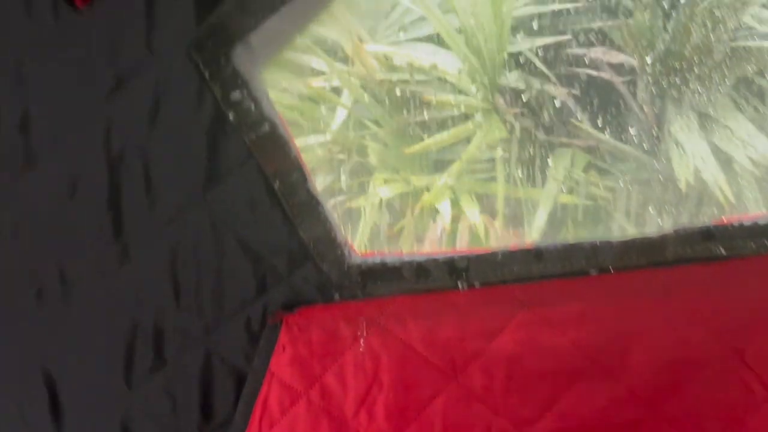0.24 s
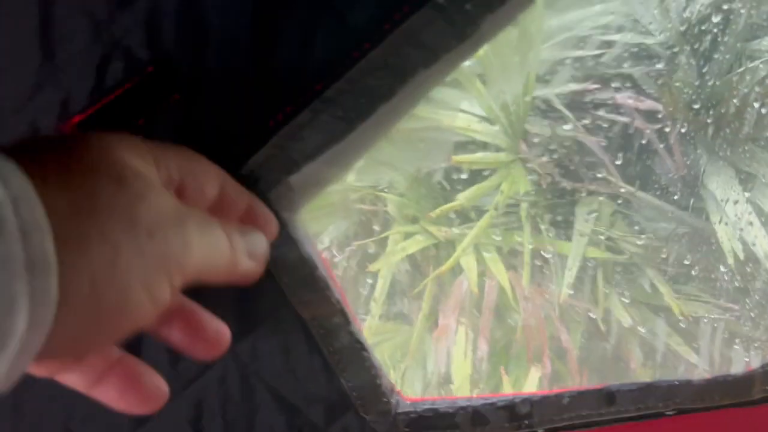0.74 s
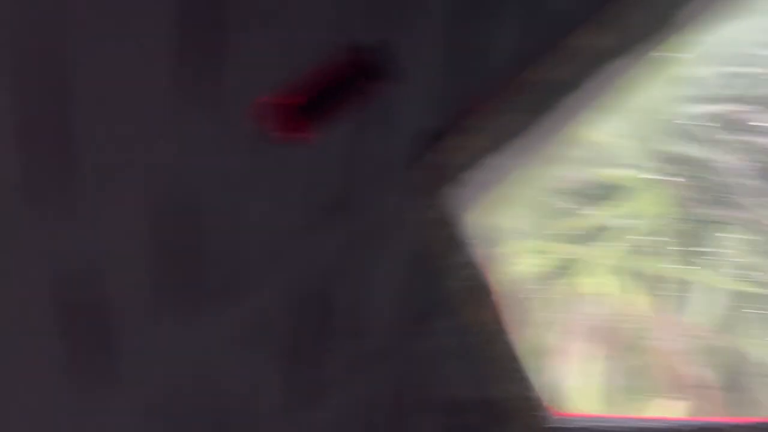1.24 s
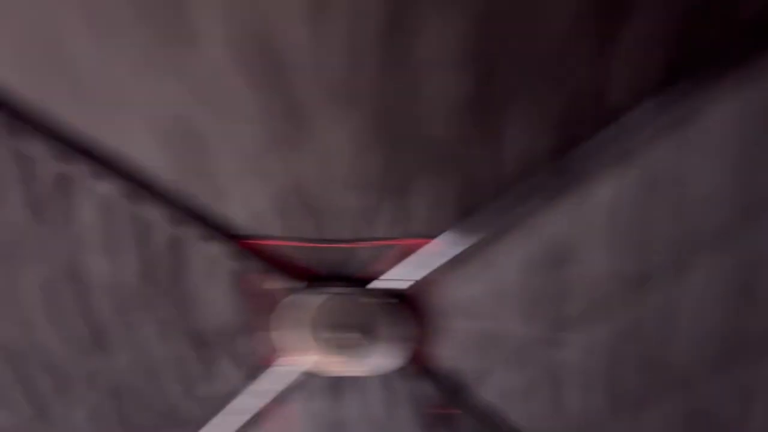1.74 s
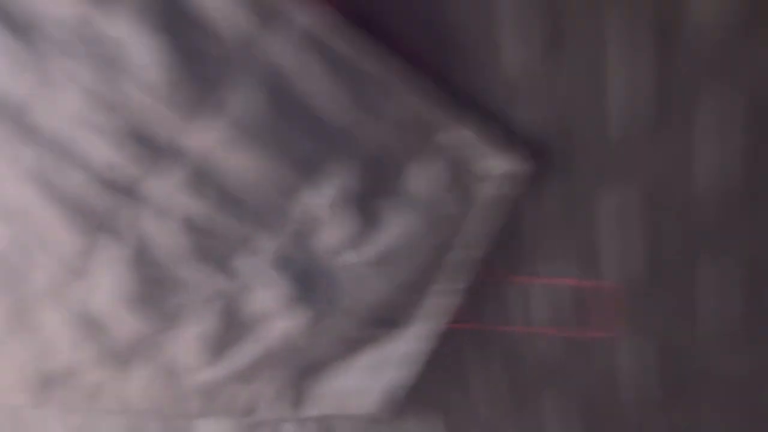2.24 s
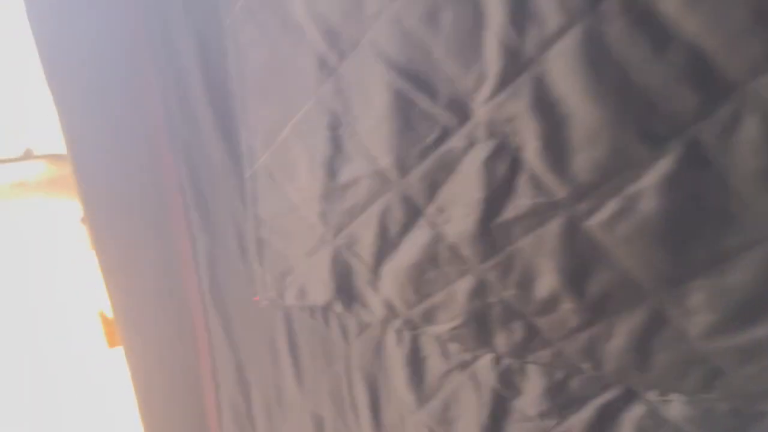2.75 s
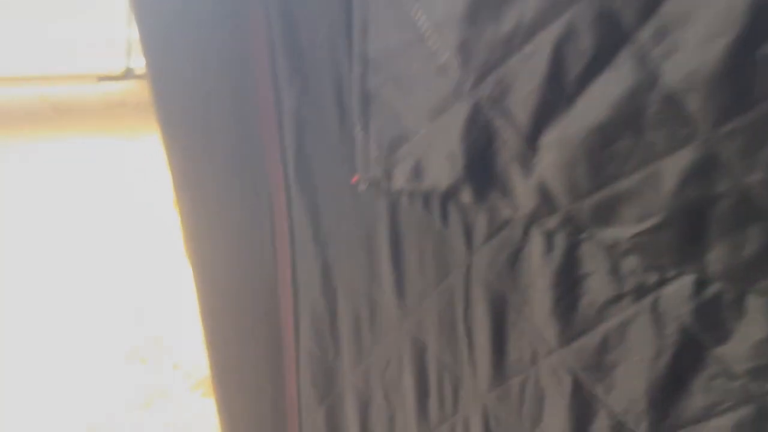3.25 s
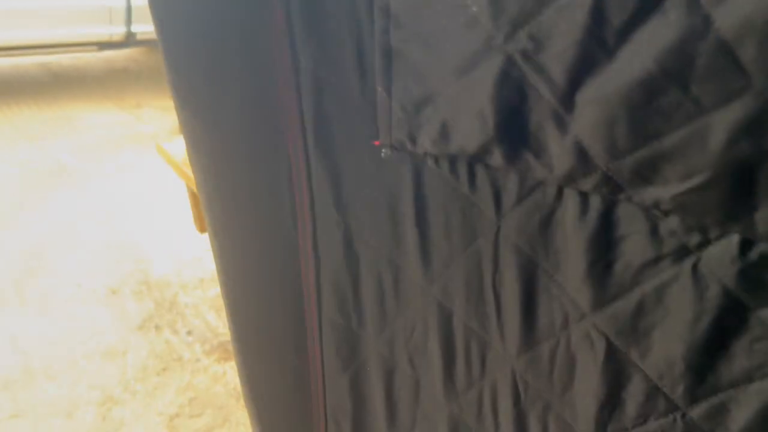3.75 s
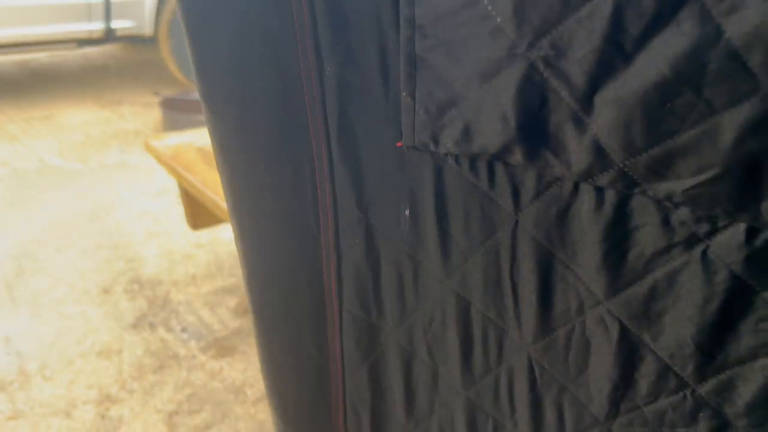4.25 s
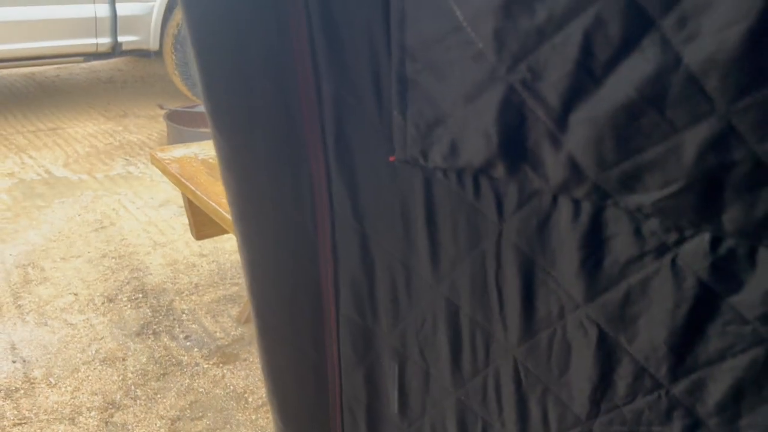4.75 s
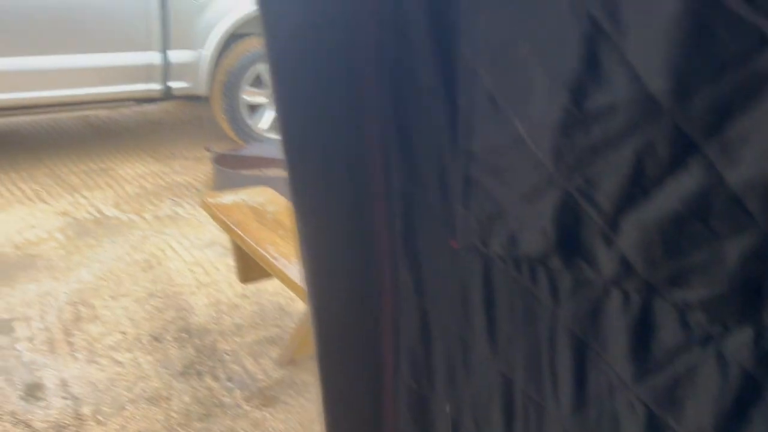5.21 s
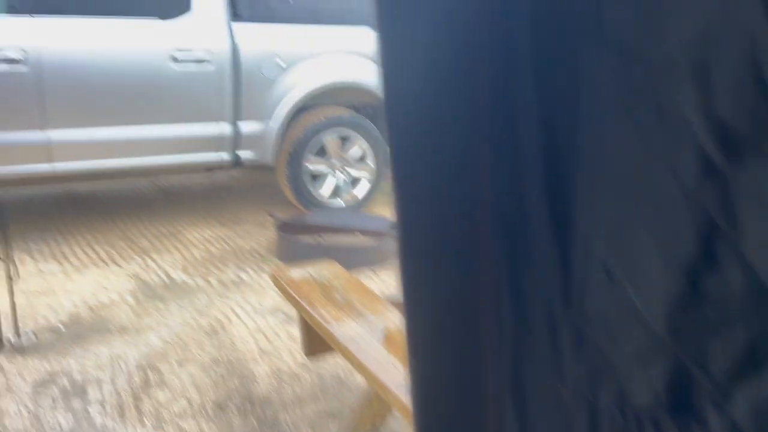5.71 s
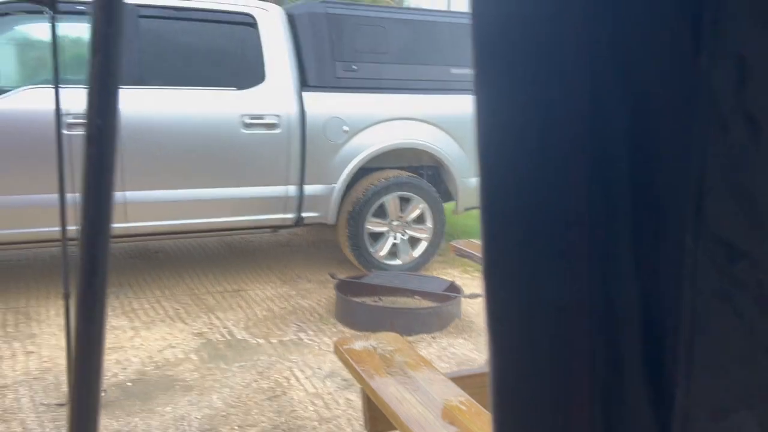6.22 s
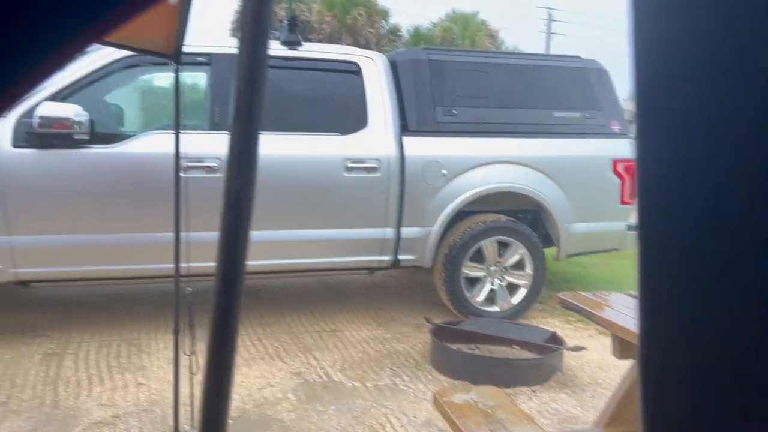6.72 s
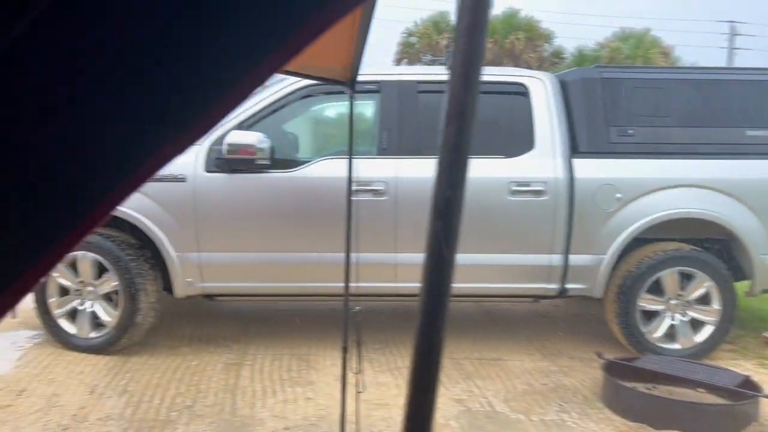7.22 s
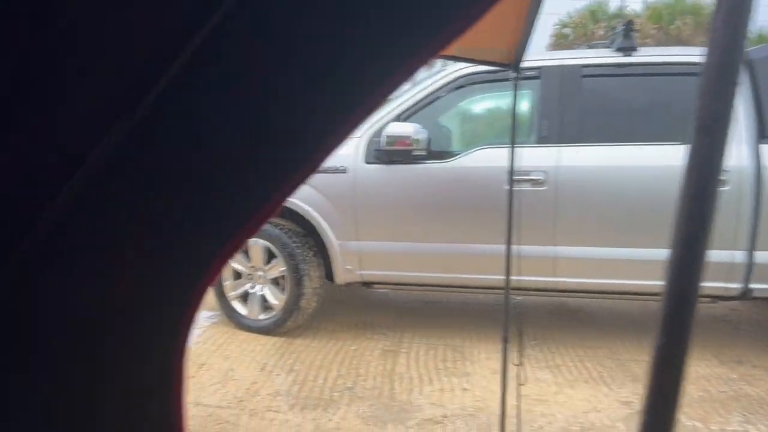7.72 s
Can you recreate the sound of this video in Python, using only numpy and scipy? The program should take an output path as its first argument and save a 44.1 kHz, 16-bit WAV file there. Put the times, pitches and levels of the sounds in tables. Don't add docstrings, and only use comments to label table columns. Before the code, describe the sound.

Low, steady air conditioner drone with rushing air, under a soft hiss of rain on tent cloth and crisp, irregular drop ticks.

```python
import sys
import numpy as np
from scipy import signal
from scipy.fft import rfft, irfft, next_fast_len
from scipy.io import wavfile
from scipy.ndimage import uniform_filter1d, map_coordinates

SR = 44100
rng = np.random.default_rng(int(sys.argv[2]) if len(sys.argv) > 2 else 0)


def gain_from_db(level_db):
    decades = np.asarray(level_db, float) / 20
    return 10 ** decades


def pcm_store(signal):
    levels = np.round(np.clip(np.atleast_2d(signal), -1, 1) * 32767)
    wavfile.write(sys.argv[1], SR, levels.astype(np.int16).T)


N = 351374

# time_s, facing
FACING = [
    (0, 0.67),
    (1.2, 0),
    (2.6, 0.23),
    (5.0, 0.46),
    (6.2, 0.9),
    (7.97, 0.8),
]
# time_s, level_db
TURBULENCE = [(0.0, -23.5), (0.11, -17.5), (0.18, -17.5), (1.88, -20), (1.91, -17.5), (3.48, -18),
              (3.51, -14.5), (3.62, -18.5), (6.9, -19.5), (7.81, -18), (7.97, -24.5)]
# facing_unit_db, door_gain_db, side_on_gain_db, patch_depth_db
AIR_LAYERS = [
    (1, -0.5, 0.17, -0.22),
    (-32.5, 1.5, -0.3, 1.35),
    (-28.5, -2.5, -1.8, 0.74),
    (-37, 3, 2.5, 0.7),
    (-40.5, -6, -1.5, 2.5),
    (-36.5, -6, -5, 2),
]
# pitch_hz, density_db
RUMBLE_SPECTRUM = [(12, -56), (24, -45), (45, -4), (81, 0.5), (114, -1), (154, -2.5), (257, -20),
                   (302, -24.5), (320, -18), (420, -32.5), (700, -120)]
# pitch_hz, density_db
STREAM_SPECTRUM = [(450, -34), (680, 0.5), (900, -3), (1100, -2.5), (1700, -6.5), (2400, -12.5),
                   (3500, -20), (6000, -52)]
# pitch_hz, density_db
CASING_SPECTRUM = [(140, -7.5), (230, -2.5), (330, -2), (440, -3), (520, -13), (700, -45)]
# pitch_hz, density_db
DUCT_SPECTRUM = [(400, -8), (480, 0.5), (560, -1), (640, -2.5), (760, -43)]
# pitch_hz, density_db
GRILLE_SPECTRUM = [(380, -39), (430, -5), (455, -2.5), (480, -2.5), (540, -38)]
# pitch_hz, density_db
HOUSING_SPECTRUM = [(240, -42), (270, -7), (290, 1), (310, -9), (340, -37)]
# time_s, pitch_hz, level_db
FAN_TONE = [(0, 336, -44), (.4, 336, -41), (.9, 336, -33.5), (1.2, 336, -37), (1.7, 336.3, -33),
            (1.95, 335.5, -43), (2.2, 335.4, -34.5), (3.6, 335.5, -35.5), (4.1, 335.5, -39),
            (4.7, 335, -34), (5.2, 332.5, -34.5), (5.6, 331.5, -40), (6.3, 329, -41), (6.9, 326.5, -38),
            (7.4, 325, -43), (7.65, 324, -36), (7.97, 323.5, -36)]
# time_s, pitch_hz, level_db
COMPRESSOR_TONE = [(0, 232, -52), (2, 232, -48), (2.8, 231, -42), (3.3, 231, -50), (5.1, 230, -46),
                   (5.35, 229.5, -34), (5.9, 229, -31), (6.15, 228.5, -38), (6.4, 228, -48),
                   (6.9, 228, -33), (7.15, 228, -38), (7.35, 228, -50), (7.97, 228, -52)]
# time_s, pitch_hz, level_db
MOTOR_TONE = [(0, 882, -54), (2.4, 882, -58), (3.2, 880, -52), (4.2, 881, -51), (5.6, 881, -52),
              (7, 878, -57), (7.97, 884, -52)]
# time_s, pitch_hz, level_db
PANEL_TONE = [(0, 765, -49), (2, 765, -50), (3.5, 762, -56), (7.97, 760, -56)]
# time_s, pitch_hz, level_db
ELECTRIC_TONE = [(0, 6160, -62), (4, 6240, -65.5), (7.97, 6240, -67)]
# pitch_hz, density_db
HISS_SPECTRUM = [(1500, -20), (2800, -1), (4000, -1), (5900, -1), (7000, -5.5), (9000, -9.5),
                 (10800, -19.5), (12000, -39), (16000, -55)]
# pitch_hz, density_db
SPRAY_SPECTRUM = [(6000, -26), (9000, 1.5), (11200, 3), (12000, -13), (13500, 0), (15300, -8), (15800, -4),
                  (16300, -24)]
# start_s, peak_db, tick_hz, cloth_db
NEAR_DROPS = [(0.5685, -30, 6800, -16), (0.6177, -24.5, 5400, -22), (0.793, -27, 5700, -1),
              (0.9379, -28, 7100, 9), (1.824, -32, 5100, -13), (1.9977, -25, 6140, -23),
              (2.0986, -31, 6300, -12), (2.33, -28, 6740, -26), (2.5974, -29, 5530, -14),
              (3.4048, -26, 4900, -8), (3.789, -29, 9130, -17), (3.907, -28, 7700, -14),
              (4.121, -25, 5780, -26), (4.1869, -31.5, 8310, -13), (4.441, -29, 6330, -10),
              (4.6836, -27, 6600, -4), (4.7646, -29, 7850, -6), (4.807, -28, 6450, -18),
              (5.0213, -15, 6530, -1), (5.1524, -29, 8500, -17), (5.401, -28, 7600, -17),
              (5.468, -25.5, 4900, -8), (5.5134, -29, 8450, -16), (5.8985, -30, 7850, -11),
              (6.039, -12.5, 7650, -7.5), (6.145, -27, 7800, -10), (6.148, -26, 3200, -20),
              (6.203, -30, 7260, -17), (6.358, -29, 7840, -21), (6.6781, -18, 8100, 2),
              (6.8317, -27, 9200, -28.5)]
# start_s, peak_db (tick and hiss together), tick_hz
FAR_DROPS = [(0.2123, -27, 5950), (1.672, -35, 5130), (1.7009, -26, 4110), (1.925, -29, 5910),
             (2.2632, -36, 5710), (2.3829, -29, 4970), (2.394, -32, 4760), (2.4164, -27, 5880),
             (2.8684, -32, 4410), (2.8917, -28, 6230), (3.0129, -29, 4450), (3.3308, -33, 5820),
             (3.9355, -27, 4060), (4.0987, -34, 5580), (4.2117, -26, 5060), (4.2506, -26, 4980),
             (4.6199, -32, 4100), (4.9156, -35, 4630), (5.0997, -26, 4010), (5.174, -35, 4410),
             (5.3796, -34, 5840), (5.4998, -29, 8200), (5.5284, -28, 5820), (5.5634, -27, 4140),
             (5.6584, -34, 4580), (0.689, -31, 8300), (0.696, -31, 8200), (5.5375, -29, 8000),
             (6.0632, -26, 8100), (6.2628, -26, 8100), (6.1159, -37, 4090), (6.2621, -32, 5820),
             (6.3704, -28, 5990), (6.4546, -30, 5010), (6.6432, -31, 4170), (6.8464, -32, 6180),
             (6.988, -29, 4950), (7.0298, -27, 5870), (7.3042, -32, 5300), (7.3405, -27, 6840)]
# start_s, peak_db, pitch_hz
SPLASHES = [(0.605, -52, 11000), (0.6169, -35, 11100), (0.6548, -38, 11500), (0.7765, -53, 11400),
            (0.7925, -32, 10600), (0.9197, -36, 15600), (0.937, -23, 11450), (1.685, -36, 10900),
            (1.997, -37, 10700), (2.33, -35, 11100), (2.4163, -30, 11100), (2.8692, -33.5, 10800),
            (3.045, -39, 11820), (3.2135, -43, 15500), (3.332, -30, 12500), (3.671, -38, 10800),
            (3.79, -31, 11100), (3.935, -29, 15300), (4.1075, -47, 15100), (4.1199, -36, 14950),
            (4.1868, -36, 11100), (4.2142, -38, 10800), (4.2511, -37, 11700), (4.3379, -46, 11540),
            (4.353, -31.5, 15100), (4.6103, -32, 11300), (4.6906, -34, 13000), (4.765, -35, 10800),
            (4.8059, -24, 15300), (4.9166, -35, 15600), (5.02, -29, 12100), (5.0992, -47, 10800),
            (5.1521, -47, 10650), (5.4, -37, 11200), (5.4998, -36, 11900), (5.5123, -32, 11400),
            (5.5452, -39, 11300), (5.5633, -32, 10900), (5.8929, -44, 11500), (5.899, -32, 14800),
            (6.0388, -24, 15500), (6.0474, -31, 11000), (6.0644, -36, 10500), (6.1438, -41, 15100),
            (6.1668, -33, 10700), (6.2032, -35, 11700), (6.2496, -46, 15500), (6.3568, -34, 15400),
            (6.3704, -40, 10800), (6.679, -38, 10900), (6.8258, -46, 11200), (6.8308, -32, 15600),
            (7.2927, -53, 15600), (7.305, -35, 10800), (7.616, -32, 11350), (7.7891, -39, 14900)]
# delay_s, level_db
WALL_ECHOES = [
    (.0023, -14),
    (.0071, -13.5),
    (.0082, -10),
]
# time_s, level_db
BRUSH_LEVEL = [
    (.84, -67.5),
    (.885, -43),
    (.932, -36),
    (.935, -30),
    (.939, -29),
    (.9415, -36),
    (.96, -38),
    (1.0, -41),
    (1.06, -65),
]
# pitch_hz, density_db
BRUSH_SPECTRUM = [(2600, -35), (3600, -7), (4400, -6), (5200, -13), (8000, -12), (11000, -8.0),
                  (12500, -22), (15500, -11), (16300, -32)]
# pitch_hz, likeness
PORT_LIKENESS = [(60, 1), (130, 1), (290, 0.85), (640, 0.41), (1000, 0.4), (1600, 0.067), (2300, 0.49),
                 (3200, 0.42), (4300, 0.22), (5300, 0.033), (6200, 0.43), (6900, 0.1), (8300, 0.9),
                 (10000, 0.37)]
# pitch_hz, lead_rad
PORT_LEAD = [(0, 0), (150, -.12), (450, -.5), (850, 1.4), (1250, .5), (1650, -1.8), (2000, 0), (3000, 1),
             (4200, .5), (6000, .2), (7400, 1), (8500, 0), (10200, -3.1), (16500, -14.4)]
# pitch_hz, difference_db
PORT_TILT = [(60, -1.5), (110, 2), (200, -0.5), (380, 0.5), (700, -2.5), (1290, -1.5), (2380, -1.0),
             (4400, 2), (8120, 0.5), (15000, -0.5)]
GATE_THRESHOLDS = [1, -3, -4, -4.5, -4, 1.5, 2, -7, -10, 6, 10]


def unit(x):
    return x / np.sqrt(np.mean(x ** 2) + 1e-20)


def along(points, hz):
    f, v = np.transpose(points)
    return np.interp(np.log(hz + 1), np.log(f + 1), v)


def curves(rows):
    s, *cols = np.transpose(rows)
    return [np.interp(np.arange(N) / SR, s, c) for c in cols]


def wobble(rate):
    knots = rng.standard_normal(int(N * rate / SR) + 4)
    return map_coordinates(knots, [np.arange(N) * rate / SR])


def filtered(x, response):
    m = next_fast_len(N + 8192)
    return irfft(rfft(x, m) * response(np.fft.rfftfreq(m, 1 / SR)), m)[..., :N]


def spread(pair, spectrum):
    def response(hz):
        angle = np.arccos(np.clip(along(PORT_LIKENESS, hz), -1, 1)) / 2
        inside = (hz > spectrum[0][0]) & (hz < spectrum[-1][0])
        return inside * gain_from_db(along(spectrum, hz)) * [np.cos(angle), np.sin(angle)]

    mid, side = filtered(pair, response)
    return unit(np.array([mid + side, mid - side]))


def patchy(depth_db):
    z = signal.stft(rng.standard_normal((2, N)), nperseg=512)[2]
    field = rng.standard_normal(z.shape[1:])
    for axis in (0, 1):
        field = uniform_filter1d(field, size=8, axis=axis)
    return signal.istft(z * gain_from_db(depth_db * unit(field)), nperseg=512)[1][:, :N]


def patter(share, spread_db):
    sizes = gain_from_db(spread_db * np.minimum(rng.exponential(size=N), 3))
    falls = (rng.random(N) < 150 / SR) * sizes
    t = np.arange(300) / SR
    bumps = unit(signal.fftconvolve(falls, np.exp(-t / 0.0023))[:N])
    return np.sqrt(1 + np.abs(share) * bumps ** 2)


def scattered(per_s, db, scatter_db, low_hz, high_hz):
    luck = rng.random((round(per_s * N / SR), 3))
    return [(a * N / SR, db + scatter_db * (2 * b - 1), low_hz + c * (high_hz - low_hz)) for a, b, c in luck]


def tone(rows, drift_hz, flutter_db):
    hz, db = curves(rows)
    phase = 2 * np.pi * np.cumsum(hz + drift_hz * wobble(5)) / SR
    return np.sqrt(2) * gain_from_db(db + flutter_db * wobble(3.53)) * np.sin(phase)


def conditioner():
    facing, = curves(FACING)
    side_on = 4 * facing * (1 - facing)
    swells = [curves(TURBULENCE)[0]] + [0.5 * wobble(2.91) for _ in AIR_LAYERS[1:]]
    spectra = [RUMBLE_SPECTRUM, STREAM_SPECTRUM, CASING_SPECTRUM,
               DUCT_SPECTRUM, GRILLE_SPECTRUM, HOUSING_SPECTRUM]
    out = 0
    for swell_db, spectrum, (db, door_db, side_db, patch_db) in zip(swells, spectra, AIR_LAYERS):
        level_db = swell_db + db + door_db * facing + side_db * side_on
        out = out + gain_from_db(level_db) * spread(patchy(patch_db), spectrum)
    out = out + tone(FAN_TONE, drift_hz=0.49, flutter_db=1.6)
    for rows in (COMPRESSOR_TONE, MOTOR_TONE, PANEL_TONE, ELECTRIC_TONE):
        out = out + tone(rows, drift_hz=0.61, flutter_db=2.5)
    return out


def rain():
    facing, t = curves(FACING)[0], np.arange(N) / SR
    hiss = unit(patter(share=0.11, spread_db=4) * spread(patchy(depth_db=1.4), HISS_SPECTRUM))
    spray = unit(patter(share=0.43, spread_db=5.5) * spread(patchy(depth_db=2.5), SPRAY_SPECTRUM))
    mist_db, mist_s = -18, 0.011
    mist = sum(gain_from_db(db + mist_db) * np.exp(-np.abs(t - s) / mist_s) * (t > s) for s, db, _ in SPLASHES)
    spray_gain = gain_from_db(-55 + 1 * facing + 0.3 * wobble(25.0)) + mist
    hiss_gain = gain_from_db(-43 + 1.76 * facing + 0.3 * wobble(2.6))
    return hiss_gain * hiss + spray_gain * spray


def pulse(life_s):
    t = np.arange(160) / SR
    return (t / life_s * np.exp(1 - t / life_s)) ** 2


def ring(hz, luck, fall=0):
    t = np.arange(160) / SR
    return np.sin(2 * np.pi * (hz * t * (1 + fall * (1 - t / 0.0011)) + luck))


def crack(luck):
    return pulse(0.00005) * ring(11000, luck)


def roof_drops():
    out = np.zeros((2, N + 400))
    faint = [(s, db - 4.5, hz, -14) for s, db, hz in FAR_DROPS]
    rows = NEAR_DROPS + faint
    heavy_s = 0.0003
    for (s, db, hz, cloth_db), luck in zip(rows, rng.random((len(rows), 4))):
        heavy = db > -21
        tick = pulse(heavy_s if heavy else 0.00055) * ring(hz, luck[0], fall=0.05)
        cloth_hz = hz / 1.5 if heavy else 4050 + 400 * luck[1]
        cloth = gain_from_db(cloth_db + 4.0) * pulse(heavy_s) * ring(cloth_hz, luck[2])
        top_mode = heavy * gain_from_db(-8) * pulse(heavy_s) * ring(hz * 1.27, luck[1])
        drop = gain_from_db(db) * (tick + cloth + top_mode + gain_from_db(-8) * crack(luck[1]))
        pan_db = -0.5 - 4 * (2 * luck[3] - 1)
        out[:, round(s * SR) + 38:][:, :len(drop)] += drop * gain_from_db([[pan_db / 2], [-pan_db / 2]])
    return out[:, :N]


def splashes():
    out = np.zeros((2, N + 400))
    rows = SPLASHES + scattered(per_s=2.9, db=-51, scatter_db=5, low_hz=10900, high_hz=12800)
    for (s, db, hz), luck in zip(rows, rng.random((len(rows), 4))):
        fizz = ring(hz, luck[0])
        fizz = fizz + 0.42 * ring(12600 + 800 * luck[3], luck[1])
        fizz = fizz + gain_from_db(-5) * ring(15200, luck[2])
        splash = gain_from_db(db + 0.5) * (pulse(0.00031) * fizz + gain_from_db(7) * crack(luck[1]))
        out[:, round(s * SR) + 65:][:, :len(splash)] += splash
    return out[:, :N]


def tent(x):
    t = np.arange(SR // 12) / SR
    wet, turn = 0, np.arange(N) // 9000 % 3
    for k in range(3):
        echo = rng.standard_normal((2, len(t))) * gain_from_db(-60 * t / 0.1) * (t > 0.0015)
        echo = gain_from_db(-6) * echo / np.linalg.norm(echo[0])
        for s, db in WALL_ECHOES:
            echo[:, round(s * SR)] += gain_from_db(db)
        wet = wet + signal.fftconvolve(x * (turn == k), echo, axes=1)[:, :N]
    return filtered(wet, lambda hz: 1 / (1 + (hz / 11000) ** 4))


def brush():
    threads = spread(patchy(depth_db=1.5) * [[1], [0.25]], BRUSH_SPECTRUM)
    rustle = patter(share=0.3, spread_db=3) * threads
    return gain_from_db(curves(BRUSH_LEVEL)[0]) * unit(rustle)


def treble_gate(x):
    from_hz, bins, frame, lag = 9640, 32, 2048, 18
    line_db, mask_db, share_db = 3.5, -9, -7
    x = np.pad(x, ((0, 0), (lag, 0)))
    hz, _, z = signal.stft([x[0] + x[1], x[0] - x[1]], SR, "cosine", nperseg=frame)
    band, line = np.arange(len(hz)) // bins, np.abs(z) ** 2
    power = np.add.reduceat(line, np.arange(0, len(hz), bins), axis=1)[:, band] / bins
    both = power.sum(0)
    above_hz = (band + 0.5) * bins * hz[1] - from_hz
    index = np.clip(above_hz // (bins * hz[1]), 0, len(GATE_THRESHOLDS) - 1).astype(int)
    gate_db = np.array(GATE_THRESHOLDS)[index]
    threshold = (np.median(both, axis=1) * gain_from_db(2 * gate_db) * (above_hz > 0))[:, None]
    clear = (line > threshold * gain_from_db(2 * line_db)) & (line > power * gain_from_db(2 * mask_db))
    clear = clear & (power > both * gain_from_db(2 * share_db))
    kept = (power > threshold) & clear | (above_hz < 0)[:, None]
    mid, side = signal.istft(z * kept, SR, "cosine", nperseg=frame)[1][:, lag:][:, :N]
    return np.array([mid + side, mid - side]) / 2


def scene():
    ticks = roof_drops() + splashes()
    return conditioner() + rain() + ticks + tent(ticks) + brush()


def roll_off(x):
    return signal.sosfilt(signal.butter(12, 17150, fs=SR, output="sos"), x)


def record(dry):
    lead_hz, lead_rad = np.transpose(PORT_LEAD)

    def ports(hz):
        half = gain_from_db(along(PORT_TILT, hz) / 2) * np.exp(1j * np.interp(hz, lead_hz, lead_rad) / 2)
        edge = 1 / (1 + (hz / 15800) ** 90)
        return edge * [half, 1 / half]

    return roll_off(treble_gate(filtered(dry, ports)))


dry = scene()
out = record(dry)
pcm_store(out)
```